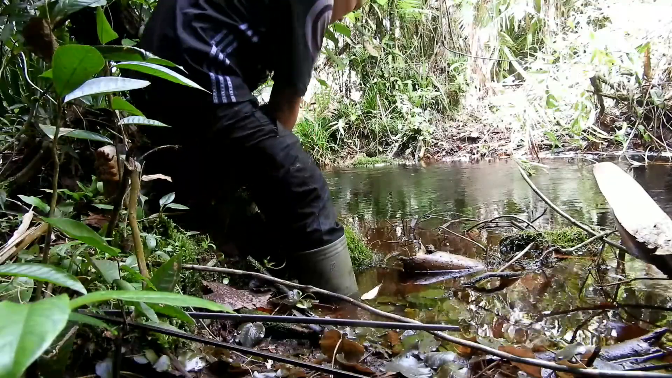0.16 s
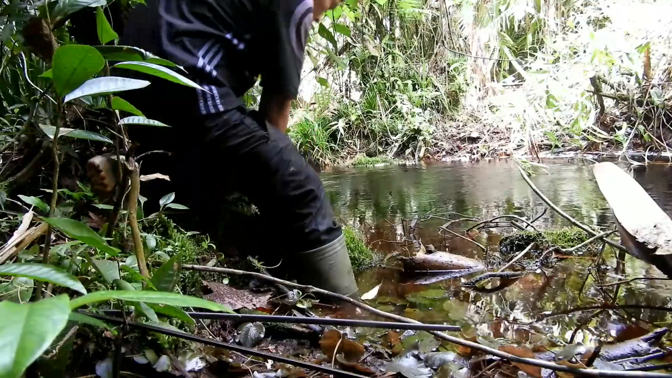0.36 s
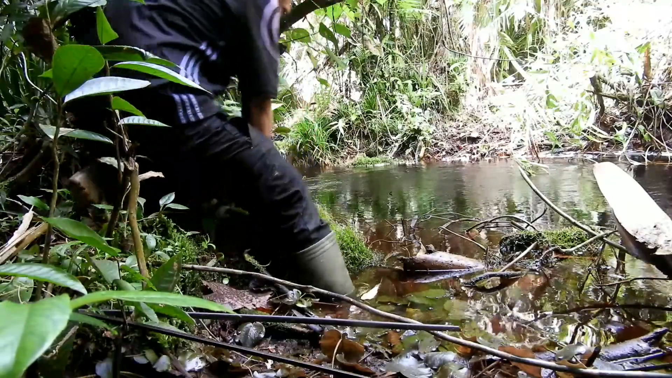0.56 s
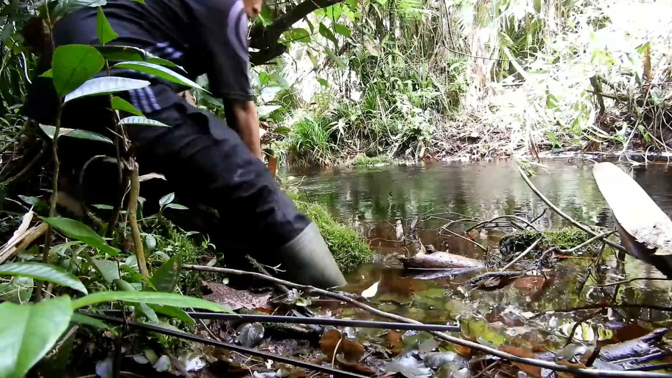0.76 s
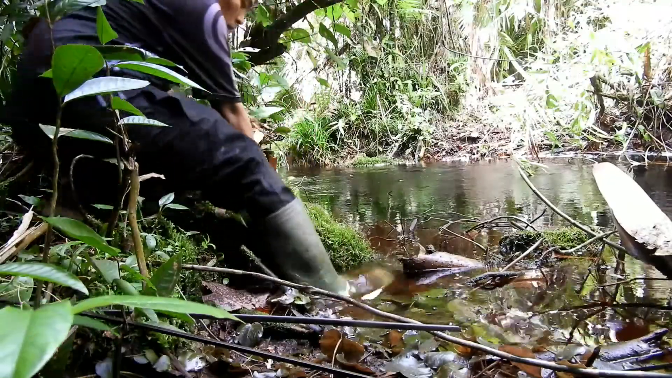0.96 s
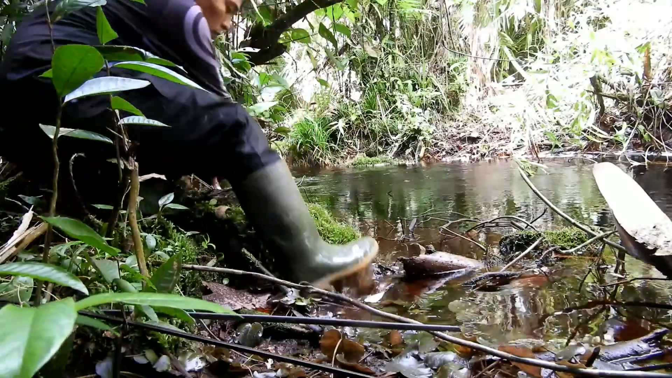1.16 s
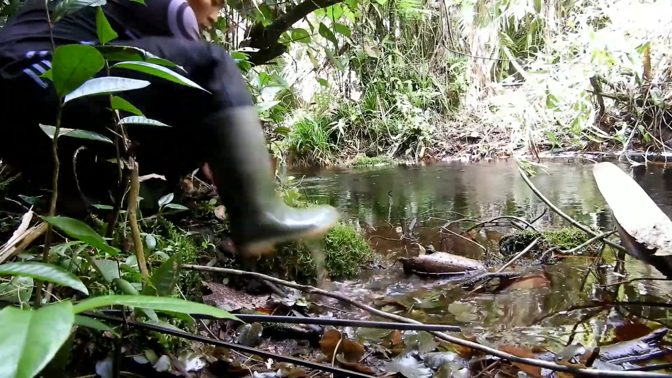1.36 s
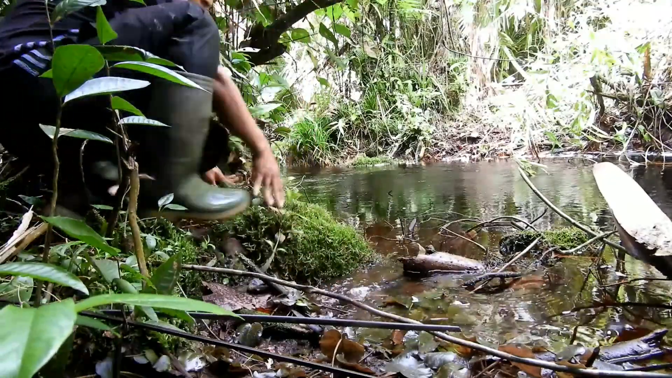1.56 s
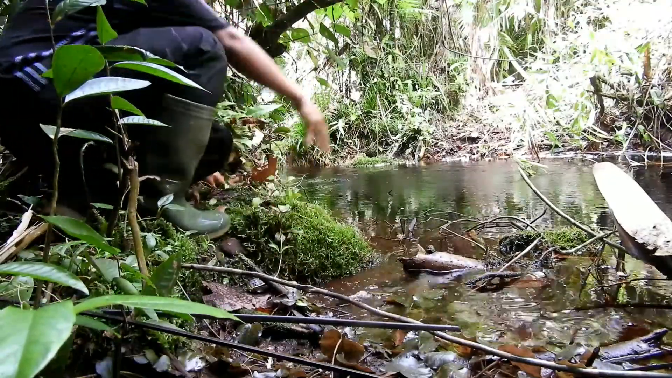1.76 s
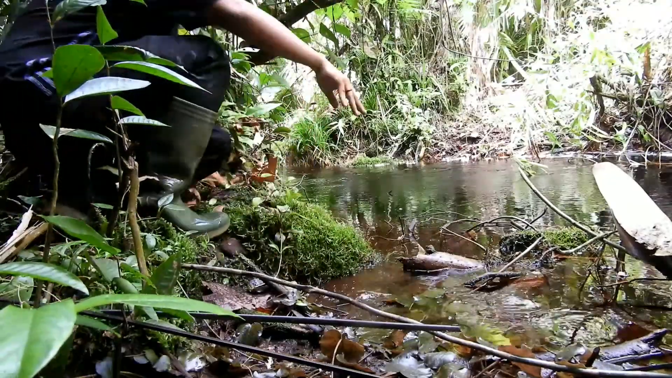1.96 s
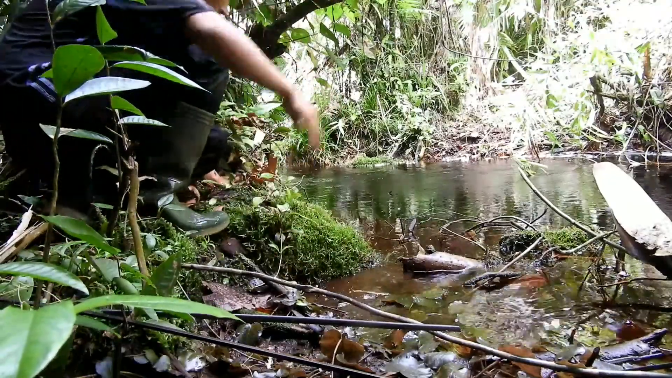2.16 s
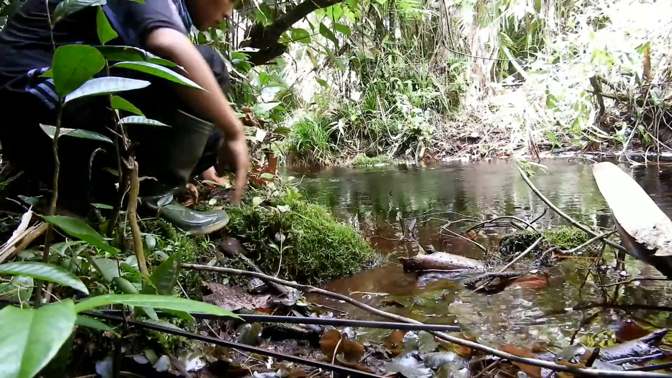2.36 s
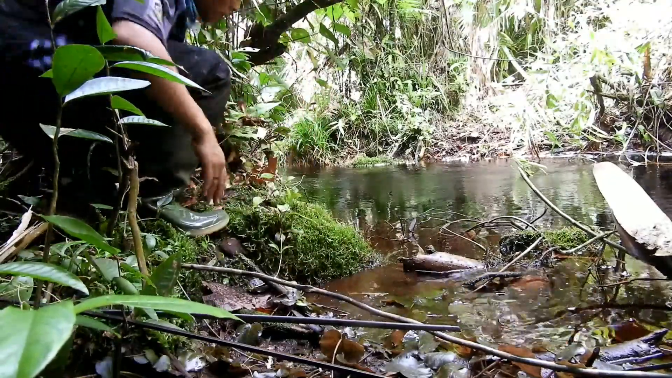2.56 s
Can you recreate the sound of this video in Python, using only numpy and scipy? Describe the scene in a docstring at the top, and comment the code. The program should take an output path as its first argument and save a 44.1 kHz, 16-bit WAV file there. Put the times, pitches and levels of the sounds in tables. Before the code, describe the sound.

A boot squelches from creekside mud at about 1.2 s, with two sharp wet pops and bubbling until 1.6 s. Before it, leaves and cloth rustle under faint bird chirps, with a small snap at 0.26 s. A bright twig crack hits at 1.5 s; soft thuds settle at 1.5-2.0 s. Light snaps, high whistles and short trills continue over quiet forest hush to 2.6 s.

```python
"""A short bird note comes first, over a quiet forest hush and softly rustling leaves.
Then a rubber boot is pulled out of wet mud by a creek: air pockets pop and bubble as sliding tones,
twigs and leaves snap as short bursts of noise, and the boot thuds on the bank as low ringing tones.
Birds whistle, trill and chip as gliding tones; the trees smear each note into a short echo of noise.
"""
import sys
import numpy as np
from scipy import signal
from scipy.fft import rfft, irfft
from scipy.io import wavfile
from scipy.ndimage import uniform_filter1d

SR = 44100
rng = np.random.default_rng(int(sys.argv[2]) if len(sys.argv) > 2 else 0)


def to_wav(s):
    """Save 16-bit WAV."""
    ch = np.atleast_2d(s).T  # columns
    pcm = np.round(np.clip(ch, -1, 1) * 32767)  # PCM
    wavfile.write(sys.argv[1], SR, pcm.astype(np.int16))


N = 114660  # length of the scene in samples, 2.6 s

# Wet squelch as the boot comes free and later settles on the bank: (time [s], level [dB])
SQUELCH_LEVEL = [(1.216, -90), (1.222, -32), (1.237, -40), (1.247, -33), (1.277, -44.5), (1.288, -30),
                 (1.305, -35), (1.335, -37), (1.44, -39.5), (1.49, -46.5), (1.54, -36.5), (1.6, -80),
                 (1.74, -48), (1.9, -61.5)]
FIZZ_PER_S, FIZZ_LOW_HZ, FIZZ_HIGH_HZ = 1200, 579, 5000
FIZZ_PITCHES = 40
FIZZ_CYCLES = 7.8  # each pitch takes 0.3 to 1.3 times this many cycles as its ring length
# Large air pockets: (time [s], level [dB], pitch [Hz], length [s], pitch rise [share per length])
AIR_POCKETS = [(1.2268, -13.5, 1400, .0016, -.1), (1.3122, -13, 660, .008, .1),
               (1.242, -28, 640, .014, .03), (1.259, -25, 950, .004, .3), (1.285, -24, 1300, .011, -.08),
               (1.301, -30, 2600, .007, -.05), (1.341, -29, 2650, .005, .08), (1.347, -31, 620, .014, .05),
               (1.368, -28, 1450, .007, .06), (1.385, -28, 900, .012, .1), (1.4185, -23, 1100, .003, .05),
               (1.43, -29, 680, .009, .1), (1.439, -28, 1000, .005, .15), (1.47, -31, 850, .007, .07),
               (1.523, -20, 1000, .009, .1), (1.523, -28, 600, .005, 0), (1.566, -33, 880, .009, .07)]
POCKET_FLUTTER = .12  # typical share by which the loudness wavers

# Twig and leaf snaps, and at 1.226 s a splash of mud as the boot comes free: (time [s], level [dB], crack
# centre [Hz], knock level beside the crack [dB])
SNAPS = [(0.2568, -23, 9300, -6), (1.0343, -26, 9100, -7), (1.226, -22, 3430, -3), (1.31, -21.5, 7060, -8),
         (1.4175, -24.5, 6670, -6), (1.4436, -26.5, 7160, -25), (1.5105, -11, 6570, -26),
         (1.6401, -24, 8500, -13), (2.0947, -27.5, 6700, 1), (2.3753, -35.5, 6200, -3)]
# T60 is the time in seconds for a sound to fade by 60 dB
CRACK_T60, CRACK_WIDTH_HZ = .011, 3000
KNOCK_T60, KNOCK_HZ, KNOCK_WIDTH_HZ = .02, 2100, 2200
TAIL_T60, TAIL_DB = .13, -20  # the tail's starting level is relative to the snap's level

# Dull thuds of the boot on soft ground:
# (time [s], level [dB], pitch [Hz], left over right [dB])
THUDS = [(1.483, -35.5, 173, 1), (1.775, -36, 185, -3), (1.7822, -29, 355, 10), (1.831, -35, 402, 2),
         (1.89, -39, 190, 5), (2.012, -33.5, 176, -1)]
THUD_CYCLES = 2.8

# Loudness of the leaves and cloth rustling: (time [s], level [dB])
RUSTLE_LEVEL = [(0, -47), (.14, -44.5), (.25, -39.5), (.27, -34.5), (.33, -43.5), (.42, -39.5), (.62, -43),
                (.7, -40), (1.1, -39), (1.3, -38.5), (1.46, -38), (1.53, -36.5), (1.62, -41.5), (1.9, -44),
                (1.95, -46), (2.6, -49.5)]
# Tone colour of the rustling: (frequency [Hz], relative level per Hz [dB])
RUSTLE_COLOUR = [(300, -7.5), (1000, -9.5), (2500, -4.5), (3500, -4.5), (4000, -8), (6000, -2), (9000, 1),
                 (10500, -6), (12000, -15), (15000, -32.5)]
CRACKLE_PER_S, CRACKLE_SPREAD_DB = 2500, 3.4
CRACKLE_SHARE = 0.47  # the rest is hiss
GUST_DB = 1.4  # typical swing of the loudness

# Bird notes: (time [s], length [s], middle pitch [Hz], level [dB])
NOTES = [(0, 0.018, 2770, -43.5), (0.152, 0.012, 1423, -39.5), (0.333, 0.027, 7620, -39.5),
         (0.567, 0.072, 6290, -48), (0.605, 0.087, 6610, -45), (0.915, 0.1, 2390, -50.5),
         (1.246, 0.033, 7630, -43), (1.573, 0.05, 6760, -45.5), (1.837, .06, 7070, -48),
         (1.937, 0.067, 6930, -42), (2.052, 0.041, 2490, -47.5), (2.081, 0.04, 1390, -45.5),
         (2.246, 0.085, 7380, -48.5), (2.305, 0.024, 1300, -44.5), (2.54, 0.086, 7750, -49)]
NOTE_RISE_HZ, WARBLE_HZ = 76, 45  # slide over one note; typical size of the random pitch wobble
# Pulsed trills of one bird: (time [s], length [s], middle pitch [Hz], level [dB])
TRILLS = [(1.474, 0.055, 3100, -44), (1.681, 0.049, 3070, -42), (2.043, 0.0637, 3067, -42),
          (2.26, 0.063, 3110, -42)]
TRILL_PER_S, TRILL_DEPTH, TRILL_RISE_HZ = 80, .5, 130
# Later copies of each trill from two far trunks: (delay [s], level beside the direct trill [dB])
TRUNKS = [(.097, -9.5), (.155, -11)]
# Falling chips of a farther bird, mostly echo: (time [s], level [dB])
CHIPS = [(0.202, -40.5), (.419, -40.5)]
CHIP_S, CHIP_TOP_HZ, CHIP_END_HZ = .013, 3450, 2050
CHIP_ECHO_DB = 10
# The chip ends in a low falling tick
TICK_DELAY_S, TICK_S, TICK_TOP_HZ, TICK_END_HZ = .016, 0.0106, 1637, 1335
TREES_T60, TREES_DB, TREES_LOW_HZ, TREES_HIGH_HZ = .6, .5, 1900, 7000

# Tone colour of the forest air: (frequency [Hz], relative level per Hz [dB])
AIR_COLOUR = [(25, -90), (60, -4), (110, -6), (170, 3), (260, -6), (700, -13), (1350, -7), (3000, -23.5),
              (4300, -14), (7900, -14.5), (15000, -34)]
AIR_DB = -50
# How alike left and right are, for air and rustling: (frequency [Hz], likeness [0-1])
LEFT_RIGHT_LIKENESS = [(60, 0.81), (500, 0.53), (2000, 0.66), (5000, 0.36), (10000, 0.056)]
BASS_EDGE_HZ, TREBLE_EDGE_HZ = 45, 15150


def amp(db):
    """Turns decibels into a plain loudness factor."""
    return 10 ** (np.asarray(db) / 20)


def evened(x):
    """Scales a signal to an average strength (RMS) of one."""
    return x / np.sqrt(np.mean(x ** 2) + 1e-20)


def slow_noise(count, window):
    """Smooths noise twice, so it wanders slowly with an average strength of one."""
    once = uniform_filter1d(rng.standard_normal(count), window)
    return evened(uniform_filter1d(once, window))


def read(points, hz):
    """Reads a table between its points, on a logarithmic frequency scale."""
    f, value = np.transpose(points)
    return np.interp(np.log(hz + 1), np.log(f + 1), value)


def level(curve):
    """Turns a table of times and decibels into a loudness factor for every sample."""
    return amp(np.interp(np.arange(N) / SR, *np.transpose(curve)))


def add(mix, s, sound, pan_db=-1.5):
    """Places a sound at a time in seconds; positive pan makes the left side louder."""
    part = mix[:, round(s * SR):][:, :len(sound)]
    part += sound[:part.shape[1]] * amp([[pan_db / 2], [-pan_db / 2]])


def band(x, hz, width_hz):
    """Keeps a band of frequencies around a centre."""
    edges = np.clip([hz - width_hz / 2, hz + width_hz / 2], 100, 11000)
    return signal.sosfilt(signal.butter(3, edges, "bandpass", fs=SR, output="sos"), x)


def pair(x, colour):
    """Colours two unrelated signals and blends them into left and right."""
    hz = np.fft.rfftfreq(N, 1 / SR)
    first, second = rfft(x)
    same = np.clip(read(LEFT_RIGHT_LIKENESS, hz), 0, 1)
    right = same * first + np.sqrt(1 - same ** 2) * second
    coloured = irfft(np.array([first, right]) * amp(read(colour, hz)), N)
    return evened(coloured) * amp([[-.5], [.5]])


def ring(hz, length, rise, attack=0.13):
    """A struck or closing cavity rings once: a fading tone whose pitch slides."""
    u = np.arange(0, 3 * length, 1 / SR) / length  # time counted in lengths
    tone = np.sin(2 * np.pi * np.cumsum(hz * (1 + rise * u)) / SR)
    return tone * np.minimum(u / attack, 1) * np.exp(-1.6 * u)


def mud():
    """Sums the small bubbles under the suction and the large pockets."""
    return band(fizz() + air_pockets(), 3200, 5600)


def fizz():
    """Many small bubbles ring at random moments, each at one of a set of pitches."""
    out = np.zeros((2, N))
    which = rng.integers(0, FIZZ_PITCHES, N)
    size = amp(1.74 * np.minimum(rng.exponential(1, N), 4))
    bursts = size * (rng.random(N) < FIZZ_PER_S / SR)
    for k, hz in enumerate(np.geomspace(FIZZ_LOW_HZ, FIZZ_HIGH_HZ, FIZZ_PITCHES)):
        cycles, rise, pan = rng.random(3)
        grain = ring(hz, FIZZ_CYCLES * (0.3 + cycles) / hz, 0.387 * rise)
        grain = grain * (hz / 1000) ** 0.28  # higher pitches are a little stronger
        add(out, 0, signal.oaconvolve(bursts * (which == k), grain), 9 * pan - 5.5)
    return evened(out) * level(SQUELCH_LEVEL)


def air_pockets():
    """Large pockets ring with a sliding pitch, and their wet walls make the loudness flutter."""
    out = np.zeros((2, N))
    for s, db, hz, length, rise in AIR_POCKETS:
        pop = ring(hz, length, rise)
        flutter = slow_noise(4000, 90)[:len(pop)]
        add(out, s, amp(db) * pop * (1 + POCKET_FLUTTER * flutter))
    return out


def snaps():
    """A breaking twig or leaf gives a bright crack, a duller knock and a short rustling tail; the splash of mud
    is built the same way."""
    out, t = np.zeros((2, N)), np.arange(5000) / SR
    for s, db, hz, knock_db in SNAPS:
        a, b, c, d = rng.standard_normal((4, len(t)))
        crack = band(a * amp(-60 * t / CRACK_T60), hz, CRACK_WIDTH_HZ)
        knock = band(b * amp(-60 * t / KNOCK_T60), KNOCK_HZ, KNOCK_WIDTH_HZ)
        crack = crack / abs(crack).max()
        knock = knock / abs(knock).max()
        add(out, s, amp(db) * (crack + amp(knock_db) * knock))
        # the two sides of the tail are nearly alike
        tail = evened(band(np.array([c, 1.1 * c + 0.24 * d]), 7340, 4300))
        tail = tail * amp(db + TAIL_DB - 60 * t / TAIL_T60)
        out[:, round(s * SR):][:, :len(t)] += tail
    return out


def thuds():
    """The boot on soft ground gives a low, quickly fading tone that sinks slightly."""
    out = np.zeros((2, N))
    for s, db, hz, pan_db in THUDS:
        add(out, s, amp(db) * ring(hz, THUD_CYCLES / hz, -0.026, 0.31), pan_db)
    return out


def rustle():
    """Tiny cracks of leaves over a brushing hiss that comes in gusts."""
    size = amp(CRACKLE_SPREAD_DB * np.minimum(rng.exponential(1, (2, N)), 5))
    size = size * rng.choice([-1, 1], (2, N))
    cracks = evened(size * (rng.random((2, N)) < CRACKLE_PER_S / SR))
    hiss = rng.standard_normal((2, N))
    mix = CRACKLE_SHARE * cracks + (1 - CRACKLE_SHARE) * hiss
    gusts = amp(GUST_DB * slow_noise(N, 1500))
    return level(RUSTLE_LEVEL) * pair(mix * gusts, RUSTLE_COLOUR)


def birds():
    """Whistles, trills and chips, each followed by its echo from the trees."""
    near, far = np.zeros((2, 2, N))
    for s, length, hz, db in NOTES:
        add(near, s, whistle(length, hz - NOTE_RISE_HZ / 2, hz + NOTE_RISE_HZ / 2, db))
    for s, length, hz, db in TRILLS:
        note = trill(length, hz, db)
        add(near, s, note)
        for delay, echo_db in TRUNKS:
            add(near, s + delay, amp(echo_db) * note)
    for s, db in CHIPS:
        add(far, s, whistle(CHIP_S, CHIP_TOP_HZ, CHIP_END_HZ, db))
        # the tick is 1.2 times as strong as the chip's listed level
        add(near, s + TICK_DELAY_S, 1.2 * whistle(TICK_S, TICK_TOP_HZ, TICK_END_HZ, db))
    into_trees = amp(TREES_DB) * near + amp(CHIP_ECHO_DB) * far
    echo = signal.fftconvolve(into_trees, trees(), axes=1)[:, :N]
    return near + far + echo


def whistle(length, first_hz, last_hz, db):
    """One fluttering note with a quick start; the pitch lingers slightly, then slides."""
    u = np.arange(0, length, 1 / SR) / length
    wobble, flutter = (evened(uniform_filter1d(v, 150))[:len(u)] for v in rng.standard_normal((2, 8000)))
    hz = first_hz + (last_hz - first_hz) * u ** 1.126 + WARBLE_HZ * wobble
    shape = np.sin(np.pi * u ** 0.64) ** .5 * (1 + .3 * flutter)
    return amp(db) * shape * np.sin(2 * np.pi * np.cumsum(hz) / SR)


def trill(length, hz, db):
    """A rising whistle whose loudness pulses quickly."""
    note = whistle(length, hz - TRILL_RISE_HZ / 2, hz + TRILL_RISE_HZ / 2, db)
    t = np.arange(len(note)) / SR
    return note * (1 - TRILL_DEPTH * np.cos(2 * np.pi * TRILL_PER_S * t))


def trees():
    """Many scattered reflections, drawn as fading noise, in two partly alike sides."""
    t = np.arange(SR) / SR
    fade = amp(-60 * t / TREES_T60) * np.minimum(t / 0.006, 1)
    a, b = rng.standard_normal((2, SR)) * fade
    b_a = signal.butter(1, [TREES_LOW_HZ, TREES_HIGH_HZ], "band", fs=SR)
    return signal.lfilter(*b_a, [a, .5 * a + 0.81 * b]) / np.linalg.norm(a)


def air():
    """Steady hush of forest and creek, made of coloured noise."""
    return amp(AIR_DB) * pair(rng.standard_normal((2, N)), AIR_COLOUR)


def scene():
    """Adds all the sources together."""
    return mud() + snaps() + thuds() + rustle() + birds() + air()


def record(dry):
    """A small microphone loses the deepest bass; a steep filter then removes the highest treble."""
    thin = signal.lfilter(*signal.butter(2, BASS_EDGE_HZ, "high", fs=SR), dry)
    treble_cut = signal.firwin(511, TREBLE_EDGE_HZ, window=("kaiser", 9), fs=SR)
    return signal.oaconvolve(thin, treble_cut[None], "same")


dry = scene()
out = record(dry)
to_wav(out)
```